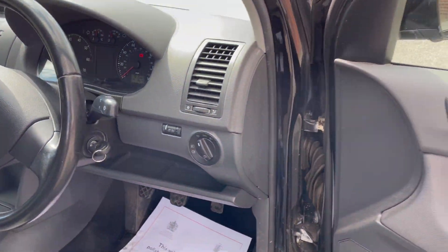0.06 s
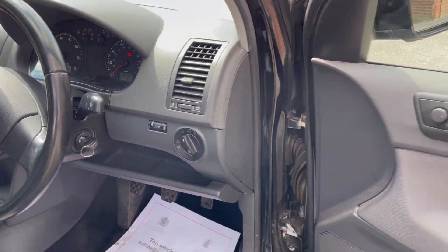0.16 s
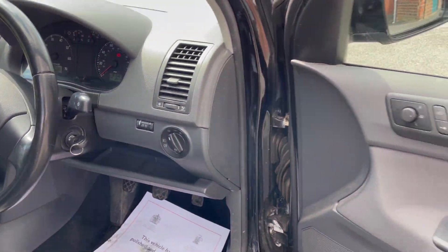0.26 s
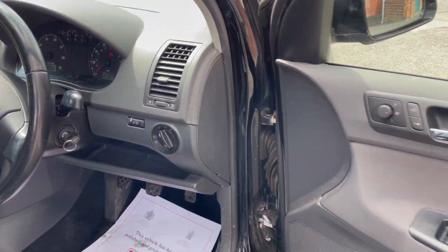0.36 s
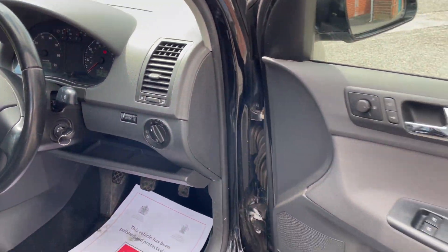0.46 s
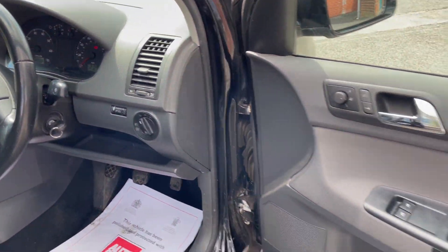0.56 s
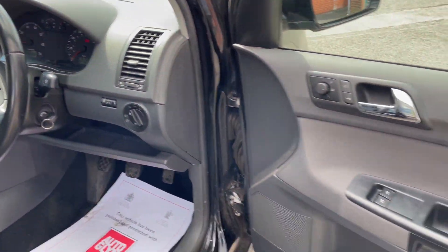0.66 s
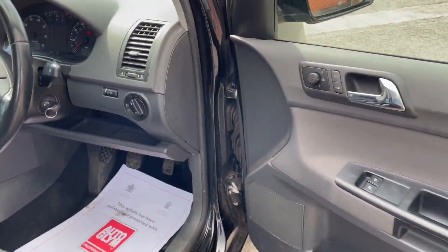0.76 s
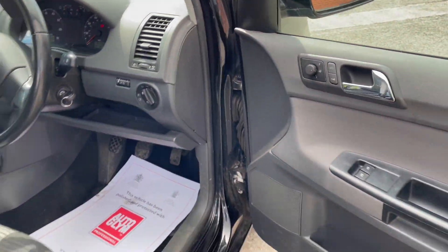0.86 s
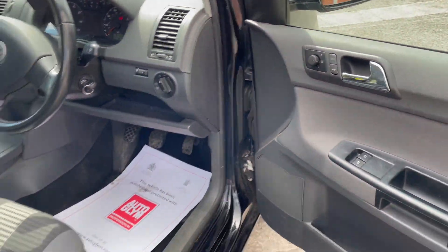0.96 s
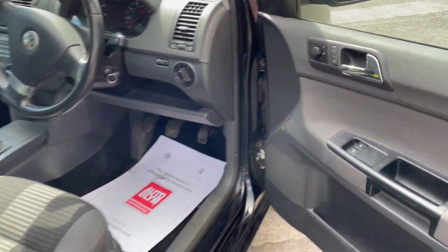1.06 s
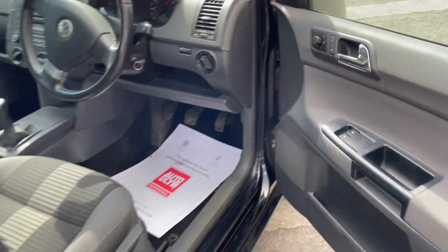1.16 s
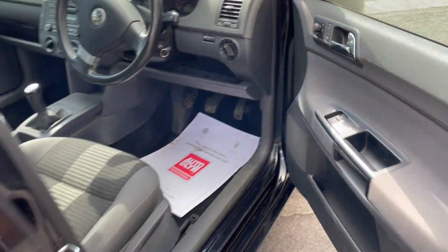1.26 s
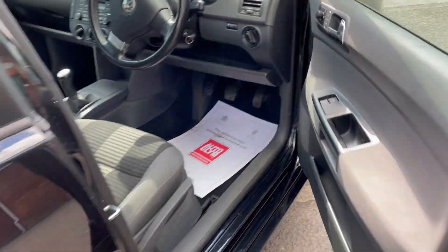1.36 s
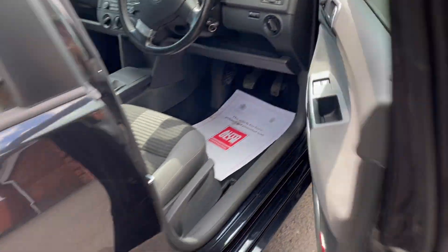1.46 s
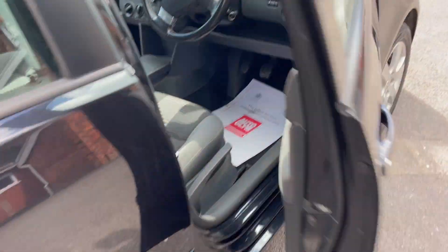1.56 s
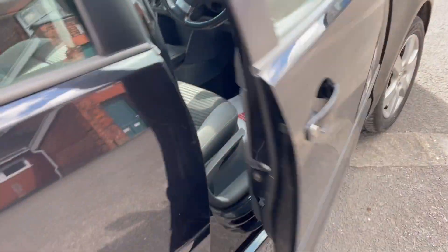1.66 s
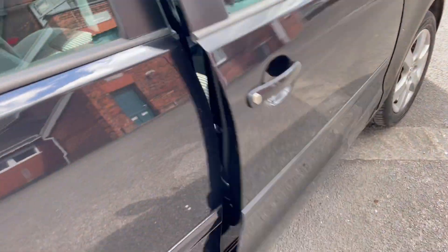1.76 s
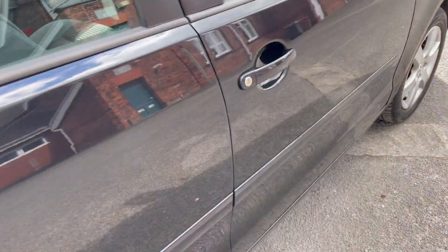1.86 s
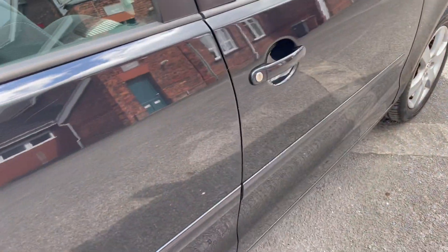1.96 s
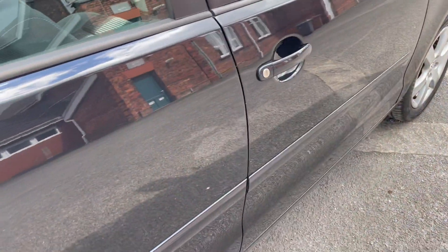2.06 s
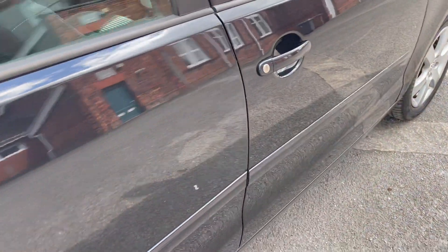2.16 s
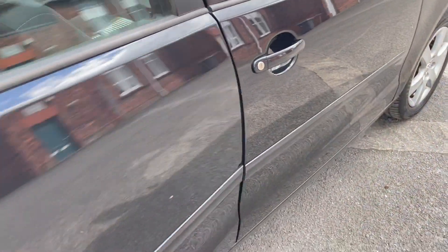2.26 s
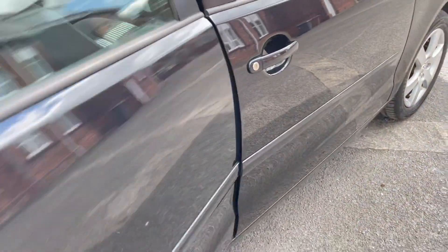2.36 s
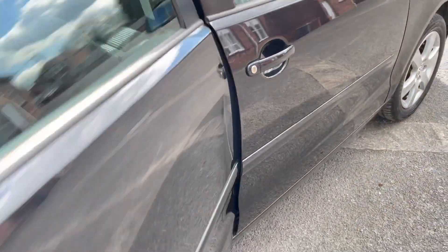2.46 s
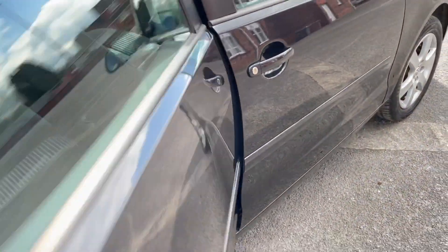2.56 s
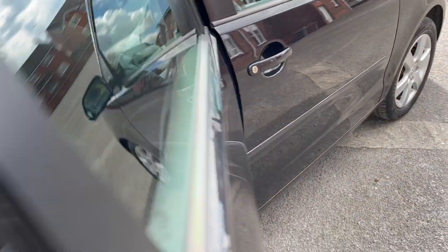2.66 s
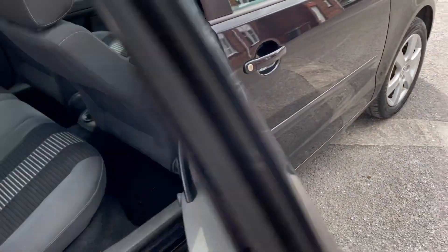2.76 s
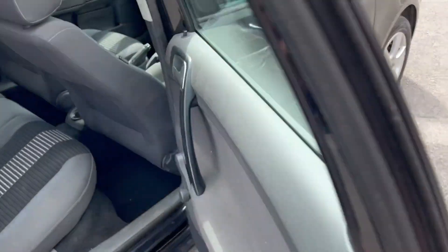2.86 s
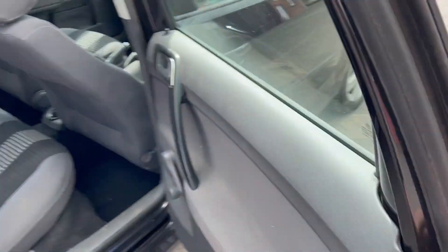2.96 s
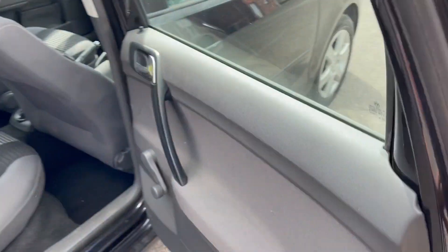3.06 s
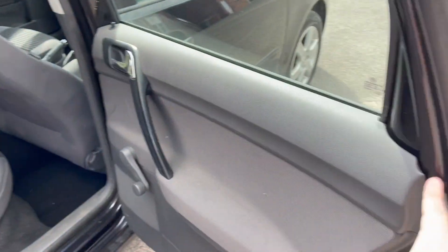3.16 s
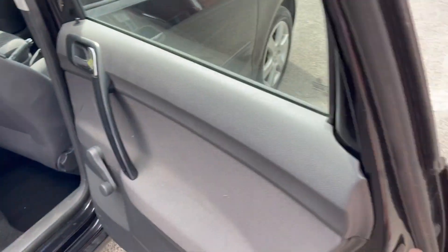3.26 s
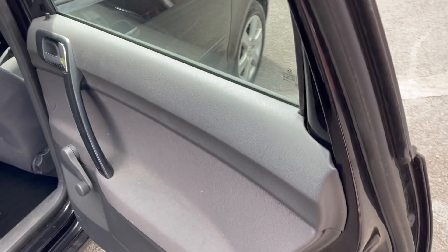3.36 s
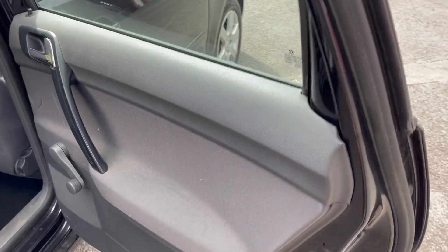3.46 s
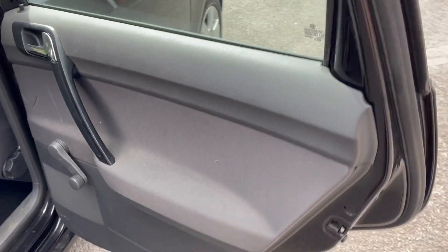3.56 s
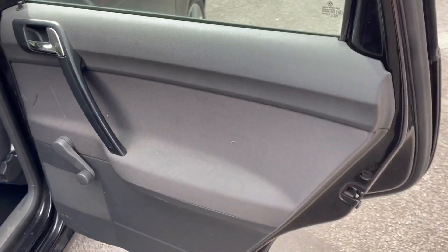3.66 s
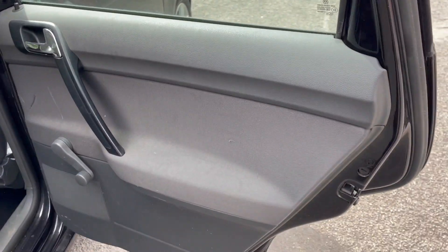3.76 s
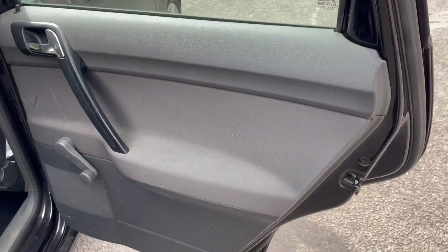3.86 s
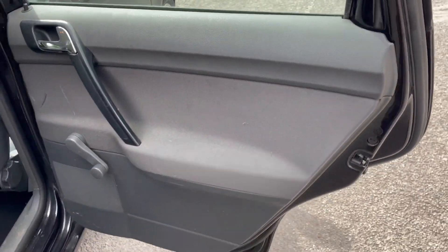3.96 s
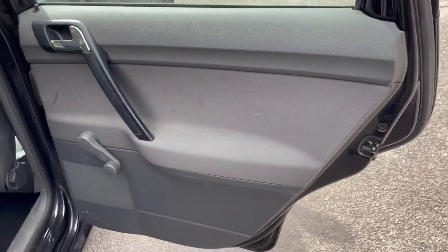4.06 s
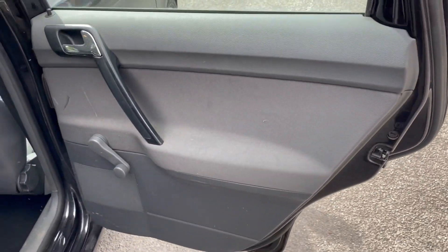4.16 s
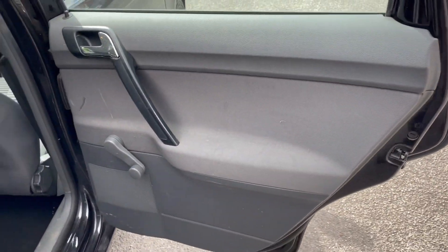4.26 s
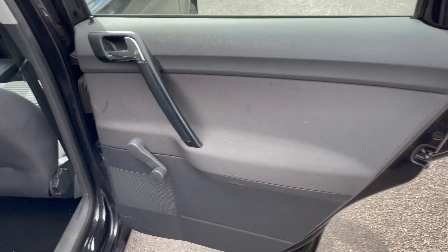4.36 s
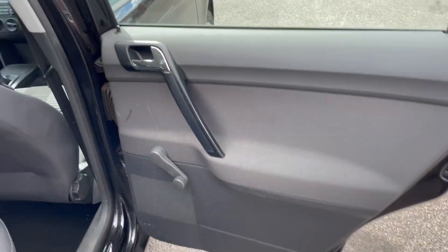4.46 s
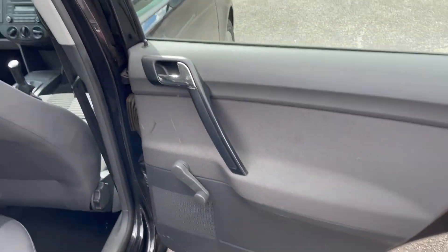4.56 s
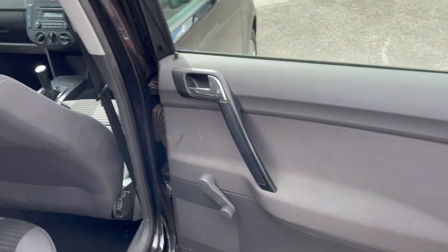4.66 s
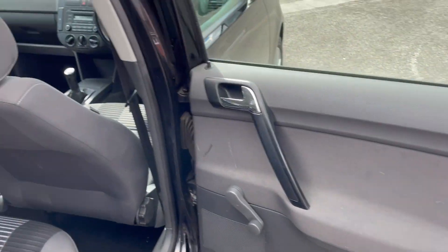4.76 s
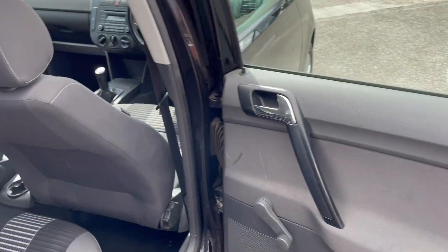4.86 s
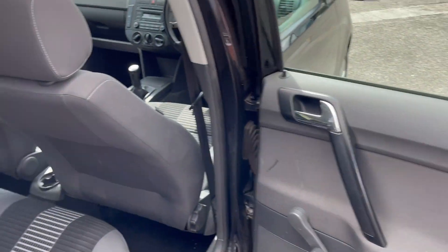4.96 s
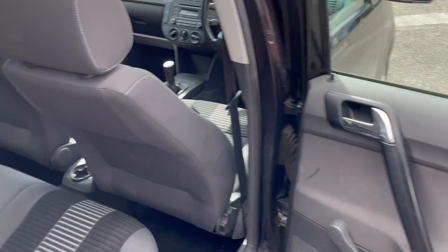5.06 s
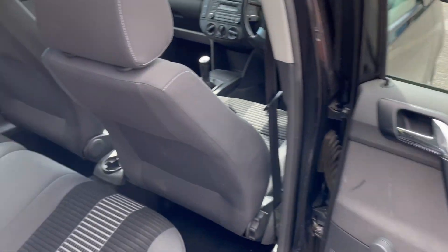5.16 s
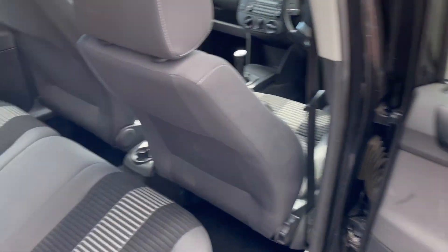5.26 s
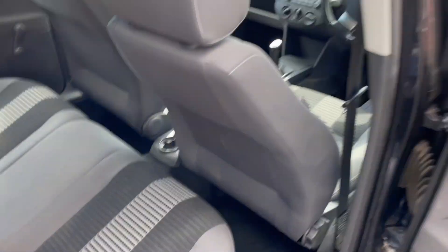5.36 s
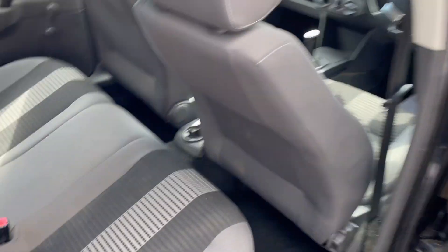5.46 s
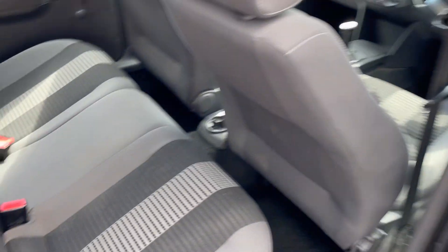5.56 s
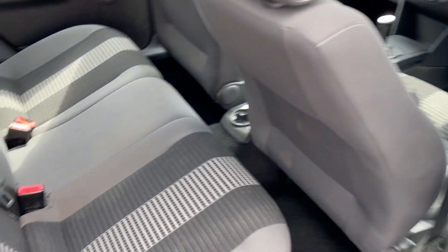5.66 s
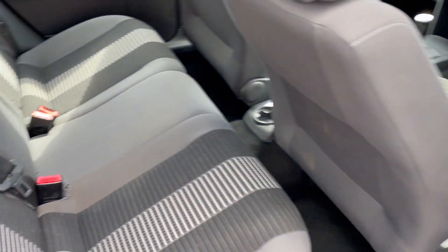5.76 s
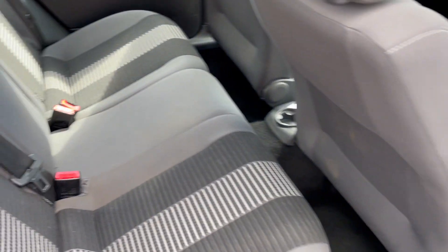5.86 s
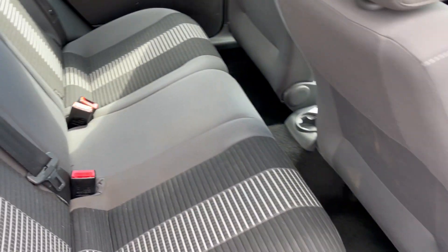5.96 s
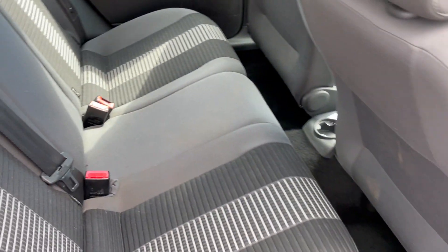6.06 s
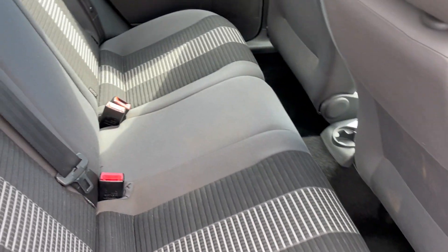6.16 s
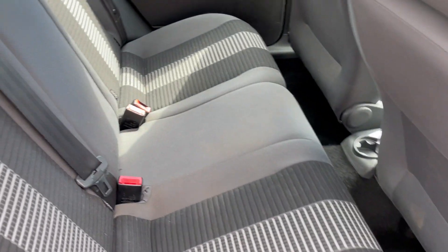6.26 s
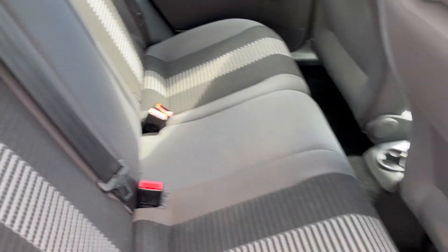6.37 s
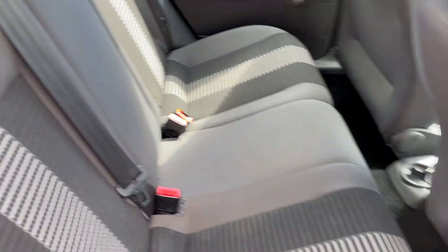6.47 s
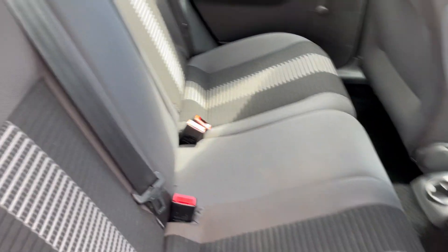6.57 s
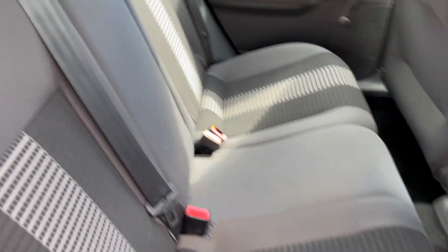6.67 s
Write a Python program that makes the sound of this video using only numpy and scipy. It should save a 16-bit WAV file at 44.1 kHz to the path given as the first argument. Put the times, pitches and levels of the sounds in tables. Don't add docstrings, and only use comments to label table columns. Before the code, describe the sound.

A parked car's front door slams with a heavy double thud, then the rear handle clunks open and a sprung catch snaps sharply at the end.

```python
import sys
import numpy as np
from scipy import signal
from scipy.fft import rfft, irfft, next_fast_len
from scipy.io import wavfile

SR = 44100
rng = np.random.default_rng(int(sys.argv[2]) if len(sys.argv) > 2 else 0)


def how_loud(loudness_db):
    steps = np.asarray(loudness_db, float) / 20
    return 10 ** steps


def digitize_waveform(pressure):
    field = np.atleast_2d(pressure).T
    bounded = np.clip(field, -1, 1)
    quanta = np.round(bounded * 32767).astype(np.int16)
    wavfile.write(sys.argv[1], SR, quanta)


N = 296307

# [t/s, latch level/dB, body level/dB, panel level/dB]
SLAM = [
    (1.7383, -30, -28.5, -34.5),
    (1.8485, -2, -30, -21.5),
    (1.8525, -19, -35, -15.5),
    (1.857, -14, -36, -30),
    (1.8625, -8, -21, -6),
    (1.8665, -21, -11.5, -18),
    (1.8705, -11, -4.5, -21),
    (1.876, -12, -27, -23),
]
# [t/s, latch level/dB, body level/dB, panel level/dB]
SEATING = [
    (1.8905, -15, -30, -30),
    (1.8932, -5, -15, -29),
    (1.8965, -6.5, -3.5, -10.5),
    (1.902, -20, -35, -14.5),
    (1.9106, -19, -17, -22),
    (1.9204, -22.5, -4, -25),
    (1.93, -18.5, -23, -30),
    (1.9341, -17, -29, -23),
]
# [t/s, latch level/dB, body level/dB, panel level/dB]
HANDLE_PULL = [(2.0827, -25.5, -24.5, -29), (2.1044, -33, -18, -30), (2.1326, -29.5, -11, -17.5),
               (2.1444, -41, -18, -25), (2.177, -23.5, -22, -24.5), (2.1874, -33, -32, -25),
               (2.2253, -30, -35, -35.5), (2.3341, -28, -37, -27.5), (2.3624, -29, -20, -24),
               (2.3794, -44, -21, -46), (2.6658, -29.5, -30, -34), (2.6824, -43, -24, -27.5)]
# [t/s, latch level/dB, body level/dB, panel level/dB]
RELEASE = [
    (2.5692, -4.5, -33, -9),
    (2.572, -11, -28, -14.5),
    (2.5765, -28, -2.5, -16),
    (2.5804, -23, -10, -20),
]
# [t/s, latch level/dB, body level/dB, panel level/dB]
DRAGS = [
    (3.1632, -28, -24, -26),
    (3.2354, -52, -32, -52),
    (3.2834, -47, -28.5, -29.5),
]
# [t/s, latch level/dB, body level/dB, panel level/dB]
CATCH = [(6.2085, -35, -39, -22.5), (6.4011, -38, -32, -37.5), (6.4103, -34, -42, -31.5),
         (6.424, -47, -55, -31), (6.553, -19.5, -48, -33), (6.5597, -19, -31, -29),
         (6.5694, -23.5, -40, -24), (6.5725, -23, -49, -24), (6.5813, -24, -51, -26),
         (6.5855, -15, -48, -28), (6.599, -20.5, -52, -35), (6.606, -42, -53, -41), (6.6594, -39, -38, -49)]
# [t/s, level/dB]
SNAPS = [
    (6.5923, -12),
    (6.5961, -1),
]
# [t/s, level/dB]
SPITS = [(1.8487, -36), (1.8625, -26), (1.868, -26), (1.877, -26), (1.89, -26), (1.8926, -12),
         (1.8965, -29), (1.931, -42), (2.5697, -20), (6.544, -42), (6.5518, -38), (6.5545, -29),
         (6.558, -34), (6.5955, -36)]
# [t/s, latch level/dB, body level/dB, panel level/dB]
KNOCKS = [(0.3957, -36, -46, -25), (0.619, -36.5, -41, -28.5), (0.7996, -56, -20, -58),
          (1.2393, -23, -19.5, -20.5), (1.2518, -28.5, -19.5, -21.5), (1.5671, -55, -23, -43),
          (3.6235, -48, -23.5, -60), (3.6553, -56, -22, -34.5), (3.8195, -57, -51, -39.5),
          (4.0064, -33, -47, -30), (4.0925, -37, -34, -48), (4.3788, -39, -49, -45),
          (5.2478, -39, -46, -49), (5.4564, -43, -51, -34), (5.66, -43, -35, -43)]
# [t/s, latch level/dB, body level/dB, panel level/dB]
RUBS = [(1.835, -27, -33, -28), (2.5605, -34, -49, -27), (2.5648, -15, -37, -29), (6.537, -31.5, -62, -36),
        (6.546, -33, -43, -34), (6.588, -17, -51, -36), (6.5965, -31, -57, -32)]
# [t/s, latch level/dB, body level/dB, panel level/dB]
CLINKS = [(4.0274, -46, -43, -41), (4.0427, -24.5, -30.5, -28), (4.1394, -37.5, -52, -50),
          (4.1637, -21, -36, -30)]
# [t/s, latch level/dB, body level/dB, panel level/dB]
STAY_CLICK = [(1.481, -21.5, -27.5, -20)]

# [f/Hz, level/dB, t60/s]
BODY_MODES = [(53, -1, 0.32), (62.7, -0.5, 0.45), (93, 0.5, 0.22), (103, -17, 0.089), (121, 2.5, 0.075),
              (157, 0, 0.12), (200.5, -10, 0.23), (222, -1, 0.019)]
# [f/Hz, level/dB, t60/s]
PANEL_MODES = [(300, 9, 0.051), (335, -1, 0.069), (353, 3, 0.073), (438, 5, 0.03), (482, 4.5, 0.03),
               (541, 3, 0.061), (636, -3.5, 0.063), (738, -0.5, 0.041), (899, -5.5, 0.055),
               (965, -27, 0.029), (1140, -11, 0.043)]
# [f/Hz, level/dB, t60/s]
LATCH_MODES = [(1340, -0.5, 0.041), (1330, -10, 0.017), (1690, -1.5, 0.0086), (2040, -8, 0.0086),
               (2150, -5, 0.012), (2417, -9, 0.028), (2650, -6.5, 0.021), (3220, -11.5, 0.0074),
               (3330, -2.5, 0.0089), (3800, -7.5, 0.0099), (4430, -13, 0.01)]
# [f/Hz, level/dB, t60/s]
NOTCH_MODES = [(1110, -6, 0.049), (1310, -1, 0.031), (1560, -8.5, 0.026), (1910, -1.5, 0.015),
               (2400, -2, 0.016), (2850, -4, 0.013), (3660, -2, .012), (4380, -8, 0.0076)]
# [f/Hz, level/dB, t60/s]
TICK_MODES = [(4620, -4, 0.011), (5330, 2.5, 0.0072), (6060, -5.5, 0.0049), (6850, 4, 0.004),
              (7360, -21, 0.016), (8000, 9, 0.0072), (8760, -7.5, 0.011), (9560, -1, 0.0074),
              (10870, -4.5, 0.0026), (12650, -11, 0.0035), (14000, -19, .005), (15516, -30, 0.0045)]
# [f/Hz, level/dB, t60/s]
REAR_BODY_MODES = [(65, 7, 0.092), (89, 3, 0.078), (133, 1, 0.084), (168.7, 2.5, 0.11), (196.8, -7, 0.27),
                   (263, -5.5, 0.08)]
# [f/Hz, level/dB, t60/s]
REAR_PANEL_MODES = [(285, 6, 0.064), (326, -1, 0.034), (452, 0.5, 0.037), (530, 0, 0.052),
                    (592, 2.5, 0.046), (730, 2, 0.033), (915, -20, 0.027), (1057, -7, 0.021)]
# [f/Hz, level/dB, t60/s]
REAR_LATCH_MODES = [(1292, 1, 0.03), (1614, 0.5, 0.024), (1900, -9, 0.021), (2210, -3.5, .02),
                    (2880, -10, 0.027), (3420, -8, .01), (4930, -14, 0.016), (6175, 3, 0.015)]
# [f/Hz, level/dB, t60/s]
REAR_SKIN_MODES = [(324, 0, 0.057), (468, 0, 0.095), (634, 0, 0.034), (732, 6, 0.058), (950, -2.5, 0.041)]
# [f/Hz, level/dB, t60/s]
REAR_FRAME_MODES = [(156, -4, 0.059), (191, -2.5, 0.11), (256, -1, 0.042)]
# [f/Hz, level/dB, t60/s]
CATCH_MODES = [(1245, -2.5, 0.039), (1757, 0, 0.017), (2030, -4, 0.011), (2510, 0.5, 0.018),
               (2850, -11, 0.016), (3280, -0.5, 0.007), (3900, -3, 0.011)]
# [f/Hz, level/dB, t60/s]
CATCH_PANEL_MODES = [(368, -12, 0.021), (490, -10, 0.1), (762, 1.5, 0.034), (690, 4.5, 0.022),
                     (810, 5.5, 0.024), (964.3, -13, 0.034), (1077, -8, 0.016)]
# [f/Hz, level/dB, t60/s]
SPIT_MODES = [(6360, -1, .004), (9200, -19, 0.0027), (10360, 2, 0.0049), (10160, -5.5, 0.0013),
              (11300, -8, 0.0046), (12300, -10, 0.0036), (13500, -10, .004)]
# [f/Hz, level/dB, t60/s]
FITTING_MODES = [(1280, 2.5, 0.0078), (1590, 10.5, 0.0037), (1860, 3.5, 0.01), (2140, 0, 0.012),
                 (2710, 3.5, 0.012), (3100, 0.5, 0.0053), (3600, 0, 0.011), (4150, -2.5, 0.01)]
# [f/Hz, level/dB, t60/s]
SOFT_PANEL_MODES = [(306, -10, 0.13), (395, -5, 0.11), (445, 3.5, 0.034), (565, 8.5, 0.012),
                    (620, -0.5, 0.025), (760, -1, 0.055), (1040, 6.5, 0.0064)]
# [f/Hz, level/dB, t60/s]
CLINK_MODES = [(1300, -6, 0.016), (1850, -20, 0.012), (2110, 2.5, 0.025), (2460, -3, 0.032),
               (2600, -2, 0.024), (3100, -14, .01), (3610, -6.5, 0.01), (4140, -6.5, 0.0086)]
# [f/Hz, level/dB, t60/s]
STAY_MODES = [(1218, 1.5, 0.013), (2300, 1.5, .015), (2740, 4, 0.019), (3100, 0, 0.017), (3420, -5, 0.025),
              (4200, -11, .01)]

# [delay t/s, level/dB]
ECHOES = [
    (.009, -22),
    (.021, -33),
]
# [f/Hz, left lead/rad]
PORT_LEAD = [(20, 0.01), (4400, .1), (6300, -.3), (7500, -2.4), (9000, -3.9), (10600, -5.65),
             (12500, -7.05), (16000, -10.2)]
# [f/Hz, level/dB]
DIFFUSE = [(40, -21.5), (300, -10.5), (700, -4.5), (5000, -4.5), (6300, -8), (7500, -32), (11700, -40),
           (14000, -25)]

# [t/s, length/s, start f/Hz, end f/Hz, peak level/dB]
BIRDS = [(0.029, 0.056, 3680, 3680, -40), (0.066, 0.047, 3770, 3900, -43), (0.111, 0.017, 3850, 3870, -41),
         (.125, 0.05, 3680, 3740, -44), (0.162, .035, 3780, 3900, -45), (.19, 0.043, 4800, 4780, -54),
         (.21, .06, 3800, 3900, -47), (.245, 0.038, 4620, 4630, -48), (0.271, 0.038, 4760, 4700, -48),
         (.315, .045, 4620, 4840, -50), (0.354, 0.039, 4680, 4600, -53), (.145, 0.082, 3220, 3250, -49),
         (0.295, 0.019, 3230, 3210, -46), (.28, .06, 4050, 3940, -50), (0.338, .05, 3300, 3180, -51),
         (5.68, .02, 4710, 4685, -55), (5.706, .022, 3800, 3050, -58), (5.77, .025, 3900, 3430, -49),
         (5.848, 0.032, 3780, 3650, -47), (5.878, .025, 3650, 3600, -50), (5.896, 0.09, 3380, 3420, -55),
         (6.0, 0.028, 3070, 3500, -58), (5.847, .05, 4150, 3850, -56), (6.225, 0.044, 7800, 7700, -45),
         (6.35, .04, 7400, 7300, -51), (6.37, .03, 8000, 8000, -48), (5.967, .03, 3350, 3800, -56),
         (5.97, .08, 3100, 3300, -66)]
# [t/s, firing f/Hz, level/dB]
ENGINE = [(0, 56.58, -38), (.9, 56.93, -35.5), (1.3, 56.98, -26.5), (1.8, 57.5, -35), (2.2, 58.33, -31),
          (2.6, 58, -36), (2.9, 57.8, -36), (3.2, 62.1, -31), (3.45, 65, -35), (3.7, 66.4, -41),
          (4.8, 69.7, -64), (5.1, 71, -36), (5.4, 71, -39), (5.7, 70.1, -49), (6, 71, -35),
          (6.4, 71.66, -38), (6.72, 73.5, -28.5)]
# [f/Hz, width/Hz, level/dB]
SINGING = [(607.5, 5.3, -57), (913, 55, -58.5), (1560, 67, -64), (2071, 49, -65.5), (2998, 117, -64),
           (4050, 30, -72.5)]
# [t/s, level/dB]
TOWN = [(0, -0.5), (.2, -0.5), (1.0, 0.5), (1.75, -0.5), (2.4, 0.5), (2.8, -1.5), (3.0, -4), (3.5, -3),
        (4.2, -4.5), (4.7, -5.5), (5.7, -5.5), (6.72, -6.5)]
# [f/Hz, level/dB per Hz]
RUMBLE = [(20, -32), (33, -19), (48, 2), (80, -0.5), (130, -7.5), (220, -15), (400, -47)]
# [f/Hz, level/dB per Hz]
ROAD = [(120, -21), (230, 1), (400, -5.5), (600, -7.5), (760, -10.5), (930, -9.5), (1500, -15.5),
        (1950, -15.5), (2250, -19), (2700, -22), (4500, -69)]
# [f/Hz, level/dB per Hz]
HISS = [(1500, -22), (2800, 0), (5000, -1.5), (7300, -3), (9000, -4), (10500, -6), (13000, -8),
        (16000, -10.5)]

SHUDDER_S, SHUDDER_GAP_S, SHUDDER_SLOWS = 1.9453, 0.013, 1.1
SHUDDER_DB, SHUDDER_LOSS_DB = (-23, -10, -25), (9, 0.5, 4.5)
DULLING = 0.73
SWING_S, SWING_DB, SWING_RISE_DB_S, SWING_FALL_DB_S = 3.14, -49, 141, 164
YARD_T60_S, YARD_DB, YARD_LOW_HZ = 0.073, -19, 200
DOOR_LEAN, CATCH_LEAN = 0.072, -0.23
LEFT_DB = -1.5
BIRD_PEAK_SHARE, BIRD_EDGE_DB = 0.4, -2.5
DRONE_HZ, DRONE_DB, DRONE_DB_PER_HZ, DRONE_FULL_HZ = 25.6, -40.5, 3.5, 71
RUMBLE_DB, ROAD_DB, HISS_DB = -34, -42.5, -52
RUMBLE_FOLLOWS, HISS_FOLLOWS = 0.9, 1.09


def door():
    gaps = SHUDDER_GAP_S * SHUDDER_SLOWS ** np.arange(4)
    shudder = []
    for k in range(4):
        levels_db = np.array(SHUDDER_DB) - k * np.array(SHUDDER_LOSS_DB)
        shudder.append((SHUDDER_S + gaps[:k].sum(), *levels_db))
    slam = contacts(SLAM, LATCH_MODES, PANEL_MODES, BODY_MODES,
                    rattle=1.0, rattle_t60=0.027, tick_db=-16, spread_db=3.5)
    seating = contacts(SEATING + shudder, NOTCH_MODES, PANEL_MODES, BODY_MODES,
                       rattle=0.93, rattle_t60=0.031, tick_db=-11.5, spread_db=1.5)
    handle = contacts(HANDLE_PULL, LATCH_MODES, REAR_PANEL_MODES, REAR_BODY_MODES,
                      rattle=0.45, rattle_t60=0.047, tick_db=-14.0, spread_db=4.5)
    release = contacts(RELEASE, REAR_LATCH_MODES, REAR_SKIN_MODES, REAR_FRAME_MODES,
                       rattle=0.7, rattle_t60=0.02, tick_db=-16, spread_db=1.5)
    drags = contacts(DRAGS, LATCH_MODES, REAR_PANEL_MODES, REAR_BODY_MODES,
                     rattle=1.7, rattle_t60=0.13, tick_db=-13, spread_db=2.0, rise_s=0.012)
    return slam + seating + handle + release + drags


def contacts(events, latch_modes, panel_modes, body_modes, rattle, rattle_t60, tick_db, spread_db,
             rise_s=0.0008):
    s, latch_db, body_db, panel_db = np.transpose(events)
    sharp_db = latch_db + tick_db - DULLING * np.maximum(body_db - latch_db, 0)
    manner = rattle_t60, spread_db, rise_s
    tick = struck(s, sharp_db, TICK_MODES, 0, rattle, *manner)
    latch = struck(s, latch_db - 8.0, latch_modes, 0, rattle, *manner)
    panel = struck(s, panel_db - 6.5, panel_modes, 0.00093, 0.68 * rattle, *manner)
    body = struck(s, body_db - 7.5, body_modes, 0.00258, 0.64 * rattle, *manner)
    return tick + latch + panel + body


def struck(times, levels_db, modes, late_s, rattle, rattle_t60, spread_db, rise_s):
    start, length = round(times[0] * SR), 3072
    span = round(times[-1] * SR) - start + SR // 2
    age = np.arange(length) / SR
    touches = rng.standard_normal((len(times), length))
    gate = rng.standard_normal((len(times), length)) > 1.2
    share = rng.standard_normal((len(times), len(modes)))
    shape = gate * (1 - np.exp(-age / rise_s)) * how_loud(-60 * age / rattle_t60)
    first = np.round((times[:, None] + late_s) * SR).astype(int) - start
    at = (first + np.arange(length)).ravel()
    out = np.zeros(span)
    for k, (hz, mode_db, t60) in enumerate(modes):
        blow = rattle * np.roll(touches, 97 * k, axis=1) * shape
        blow[:, 0] = np.sign(share[:, k]) * (rise_s < 0.003)
        size = how_loud(levels_db + mode_db + spread_db * share[:, k])
        blow *= (size / np.sqrt(np.sum(blow ** 2, axis=1)))[:, None]
        force = np.bincount(at, blow.ravel(), span)[:span]
        out += ring(force, hz, t60)
    return np.pad(out, (start, N))[:N]


def ring(force, hz, t60):
    r, w = how_loud(-60 / (t60 * SR)), 2 * np.pi * hz / SR
    return signal.lfilter([0, np.sin(w)], [1, -2 * r * np.cos(w), r * r], force + 1e-18)


def catch():
    scrape = contacts(CATCH, CATCH_MODES, CATCH_PANEL_MODES, REAR_BODY_MODES,
                      rattle=0.8, rattle_t60=0.016, tick_db=-16, spread_db=3.0)
    return scrape + snap()


def snap():
    push = np.zeros(N)
    for s, db in SNAPS:
        push[round(s * SR)] = how_loud(db)
    cavity = ring(ring(push, hz=2380.0, t60=0.0037), hz=2720.0, t60=0.0022)
    housing = ring(np.roll(push, SR // 1800), hz=875.0, t60=0.011)
    return how_loud(-14.0) * cavity + how_loud(-8.0) * housing


def spits():
    s, db = np.transpose(SPITS)
    return struck(s, db, SPIT_MODES, 0, rattle=1.5, rattle_t60=0.013, spread_db=-2.5, rise_s=0.00051)


def knocks():
    steps = contacts(KNOCKS, FITTING_MODES, SOFT_PANEL_MODES, REAR_BODY_MODES,
                     rattle=0.51, rattle_t60=0.051, tick_db=-8, spread_db=0.0)
    rubs = contacts(RUBS, CATCH_MODES, SOFT_PANEL_MODES, REAR_BODY_MODES,
                    rattle=1.2, rattle_t60=0.018, tick_db=-18, spread_db=3.0, rise_s=0.0038)
    clinks = contacts(CLINKS, CLINK_MODES, CATCH_PANEL_MODES, REAR_BODY_MODES,
                      rattle=0.62, rattle_t60=0.026, tick_db=-21.0, spread_db=3.5)
    stay = contacts(STAY_CLICK, STAY_MODES, SOFT_PANEL_MODES[:3], REAR_BODY_MODES,
                    rattle=0.63, rattle_t60=0.029, tick_db=-19.0, spread_db=-2.5)
    return steps + rubs + clinks + stay


def swish():
    air = band(rng.standard_normal((2, N)), 5000, 14000, order=2)
    t = np.arange(N) / SR - SWING_S
    level_db = SWING_DB + np.minimum(SWING_RISE_DB_S * t, -SWING_FALL_DB_S * t)
    return how_loud(np.maximum(level_db, -120)) * rms_one(air)


def yard(x):
    dull = signal.sosfilt(signal.butter(1, 3000, fs=SR, output="sos"), x)
    alike = x.copy()
    for s, db in ECHOES:
        alike += how_loud(db) * np.pad(dull, (round(s * SR), 0))[:N]
    scatter = decaying_noise(2048, 0.018)
    scatter /= np.sqrt(np.sum(scatter ** 2))
    unlike = how_loud(-1.5) * signal.fftconvolve(x, scatter)[:N]
    return np.array([alike, unlike])


def walls(x):
    tail = decaying_noise((2, SR // 2), YARD_T60_S)
    tail /= np.sqrt(np.sum(tail[0] ** 2))
    thin = high_pass(x, YARD_LOW_HZ)
    return how_loud(YARD_DB) * signal.fftconvolve(thin[None], tail, axes=1)[:, :N]


def near_scatter(x):
    paths = decaying_noise((2, 512), 0.008)
    treble = band(x, 6500.0, 12500.0, order=2)
    return how_loud(-36.5) * signal.fftconvolve(treble[None], rms_one(paths), axes=1)[:, :N]


def lean(x):
    return band(x, 400.0, 2500.0, order=1)


def birds():
    out, waver_hz, flutter_db = np.zeros(N), 45 * drift(60), 2.5 * drift(40)
    for s, length, from_hz, to_hz, db in BIRDS:
        at = slice(round(s * SR), round((s + length) * SR))
        done = np.linspace(0, 1, at.stop - at.start)
        swell_db = np.interp(done, [0, BIRD_PEAK_SHARE, 1], [BIRD_EDGE_DB, 0, BIRD_EDGE_DB])
        fade = np.clip(np.minimum(done, 1 - done) * length / 0.0028, 0, 1)
        hz = from_hz + (to_hz - from_hz) * done + waver_hz[at]
        level = how_loud(db + swell_db - 6.5 + flutter_db[at])
        out[at] += fade * level * np.sin(2 * np.pi * np.cumsum(hz) / SR)
    tails = decaying_noise((2, 4096), 0.06)
    tails[:, 0] = 30, -30
    blurred = signal.fftconvolve(out[None], rms_one(tails) / 64, axes=1)[:, :N]
    return blurred * how_loud([[0], [3.0]])


def engine():
    hz, db = in_time(ENGINE)
    hum_hz = hz + 2.066 * drift(4.07)
    hum = how_loud(db + 4.1 * drift(33.0)) * np.sin(2 * np.pi * np.cumsum(hum_hz) / SR)
    drone_db = DRONE_DB + DRONE_DB_PER_HZ * (hz - DRONE_FULL_HZ) + 1.6 * drift(1.8)
    drone = how_loud(drone_db) * np.sin(2 * np.pi * DRONE_HZ * np.arange(N) / SR)
    return (hum + drone) * how_loud([[0], [1.5]])


def singing():
    out = np.zeros((2, N))
    for hz, width_hz, db in SINGING:
        tone = band(rng.standard_normal((2, N)), hz - width_hz / 2, hz + width_hz / 2, order=1)
        out += how_loud(db + 4.6 * drift(1.0)) * rms_one(tone)
    return how_loud(1.53 * in_time(TOWN)[0]) * out


def town():
    open_db = in_time(TOWN)[0]
    rumble = how_loud(RUMBLE_DB + RUMBLE_FOLLOWS * open_db) * patchy_noise(RUMBLE, patchy_db=2.0, rate=14.0)
    road = how_loud(ROAD_DB + open_db) * patchy_noise(ROAD, patchy_db=1.4, rate=3.0)
    hiss = how_loud(HISS_DB + HISS_FOLLOWS * open_db) * patchy_noise(HISS, patchy_db=1.0, rate=27.0)
    return rumble + road + hiss


def patchy_noise(spectrum, patchy_db, rate):
    coloured = shaped(rng.standard_normal((2, N)), lambda hz: how_loud(at_hz(spectrum, hz)))
    out, low = np.zeros((2, N)), spectrum[0][0]
    while low < spectrum[-1][0]:
        octave = band(coloured, low, min(2 * low, 0.45 * SR), order=1)
        out += how_loud(patchy_db * drift(min(rate, low / 8))) * octave
        low *= 2
    return rms_one(out)


def drift(rate):
    r = np.exp(-80 * np.pi * rate / SR)
    slow = signal.lfilter([1], [1, -2 * r, r * r], rng.standard_normal(N // 40 + 2002))[2000:]
    return np.interp(np.arange(N) / 40, np.arange(len(slow)), rms_one(slow))


def decaying_noise(shape, t60):
    return rng.standard_normal(shape) * how_loud(-60 * np.arange(np.atleast_1d(shape)[-1]) / SR / t60)


def band(x, low_hz, high_hz, order):
    return signal.sosfilt(signal.butter(order, [low_hz, high_hz], "band", fs=SR, output="sos"), x)


def high_pass(x, hz):
    return signal.sosfilt(signal.butter(2, hz, "high", fs=SR, output="sos"), x)


def shaped(x, response):
    size = next_fast_len(N + 4096)
    hz = np.maximum(np.arange(size // 2 + 1) * SR / size, 1)
    return irfft(rfft(x, size) * response(hz), size)[..., :N]


def at_hz(points, hz):
    points_hz, values = np.transpose(points)
    return np.interp(np.log(hz), np.log(points_hz), values)


def in_time(rows):
    s, *columns = np.transpose(rows)
    return [np.interp(np.arange(N) / SR, s, c) for c in columns]


def rms_one(x):
    return x / np.sqrt(np.mean(x ** 2) + 1e-20)


def scene():
    doors, sprung = door(), catch()
    near = high_pass(doors + sprung + knocks() + spits(), 40.0)
    alike, unlike = yard(near) + walls(near) + swish() + birds() + engine() + singing() + town()
    unlike = shaped(unlike, lambda hz: how_loud(at_hz(DIFFUSE, hz)))
    unlike += lean(DOOR_LEAN * doors + CATCH_LEAN * sprung)
    left = shaped(alike, lambda hz: np.exp(0.5j * at_hz(PORT_LEAD, hz))) + unlike
    right = shaped(alike, lambda hz: np.exp(-0.5j * at_hz(PORT_LEAD, hz))) - unlike
    return (np.array([left, right]) + near_scatter(near)) * how_loud([[LEFT_DB / 2], [-LEFT_DB / 2]])


def low_pass(x):
    return signal.sosfilt(signal.butter(12, 15750, fs=SR, output="sos"), x)


def record(dry):
    def housing(hz):
        dip = 0.45 * np.exp(-((hz - 8250.0) / 900.0) ** 2)
        lift = 0.7 * np.exp(-((hz - 10550) / 200) ** 2)
        return 1 - dip + lift

    rounded = 1.05 * np.tanh(shaped(dry, housing) / 1.05)
    fade = np.minimum((N - np.arange(N)) / (0.004 * SR), 1)
    return low_pass(rounded * fade)


dry = scene()
out = record(dry)
digitize_waveform(out)
```